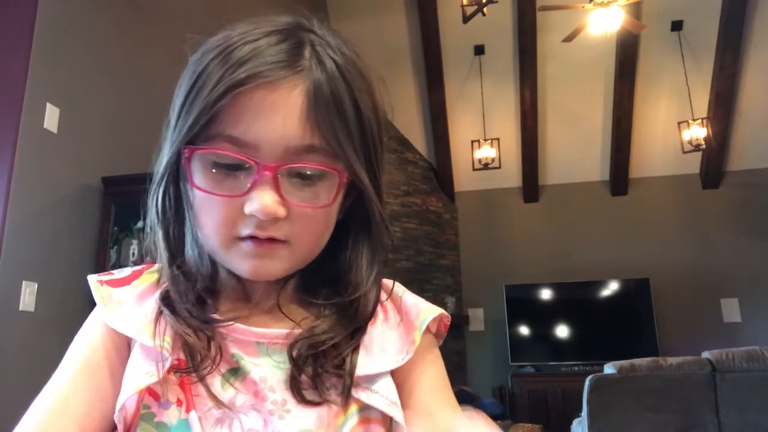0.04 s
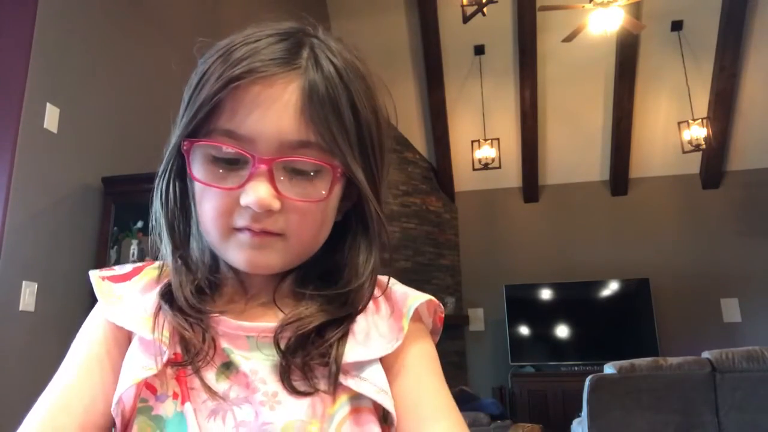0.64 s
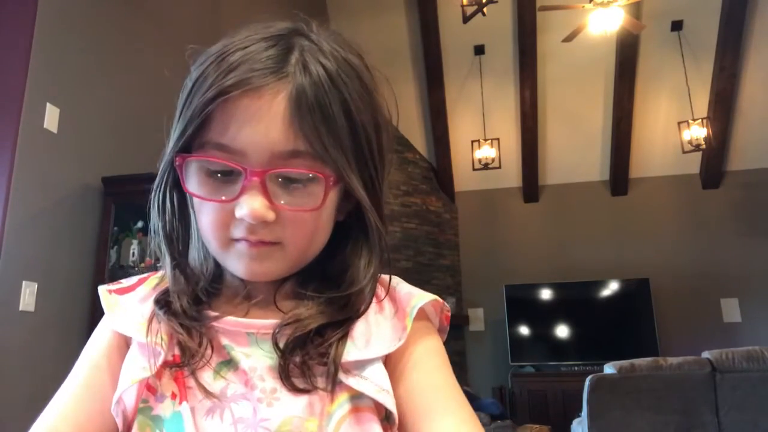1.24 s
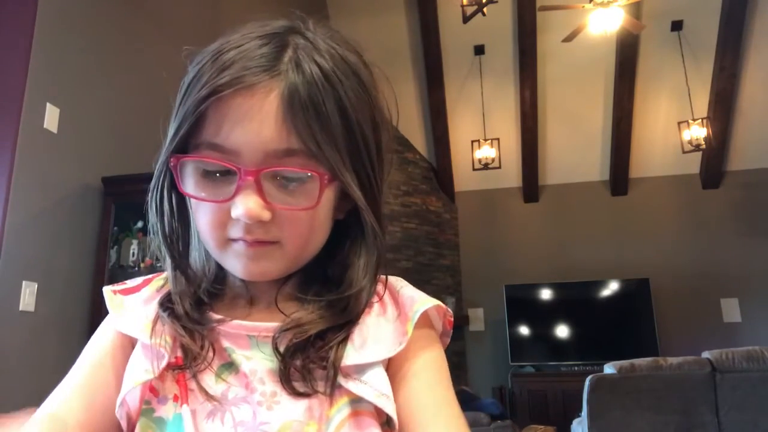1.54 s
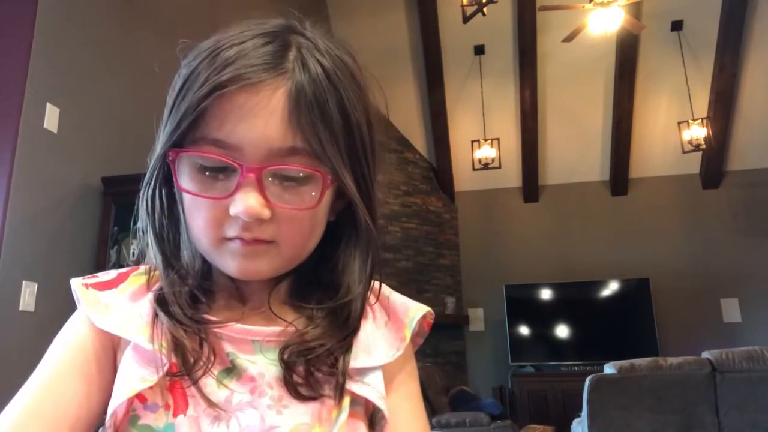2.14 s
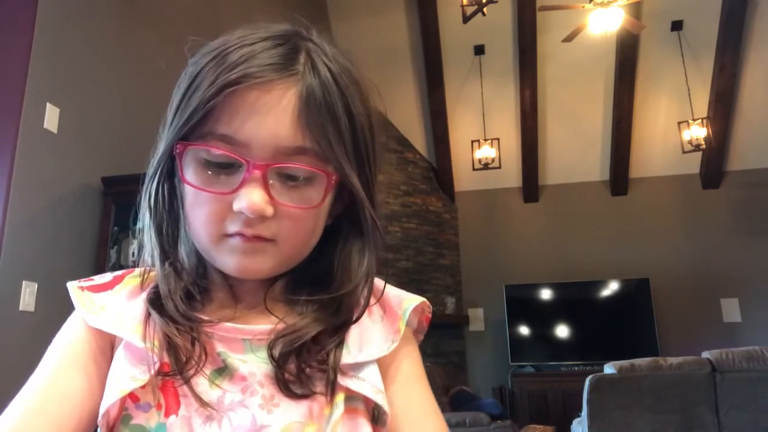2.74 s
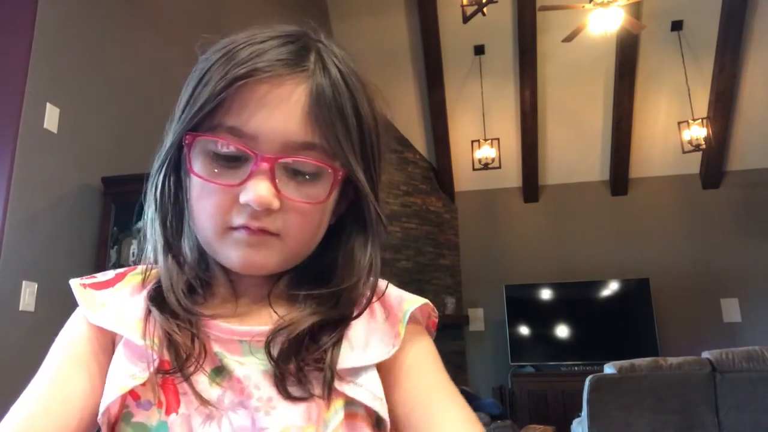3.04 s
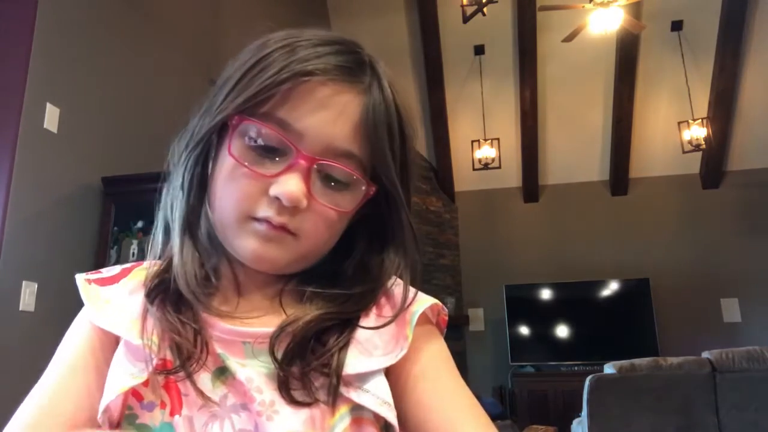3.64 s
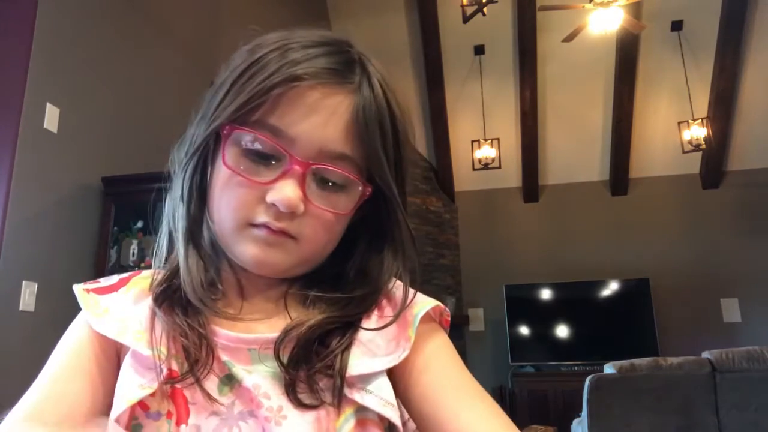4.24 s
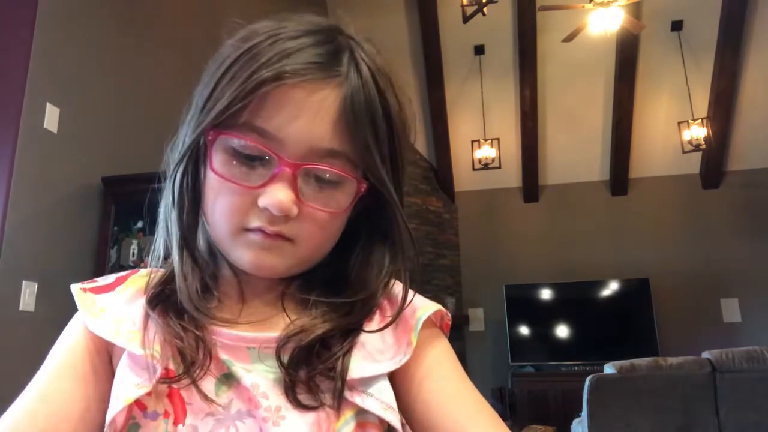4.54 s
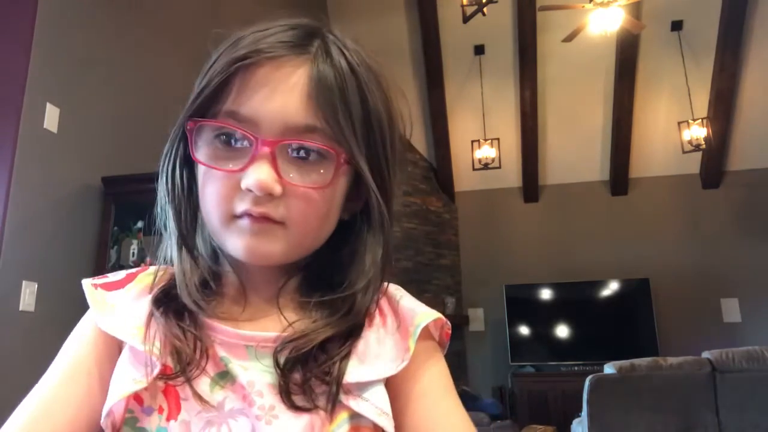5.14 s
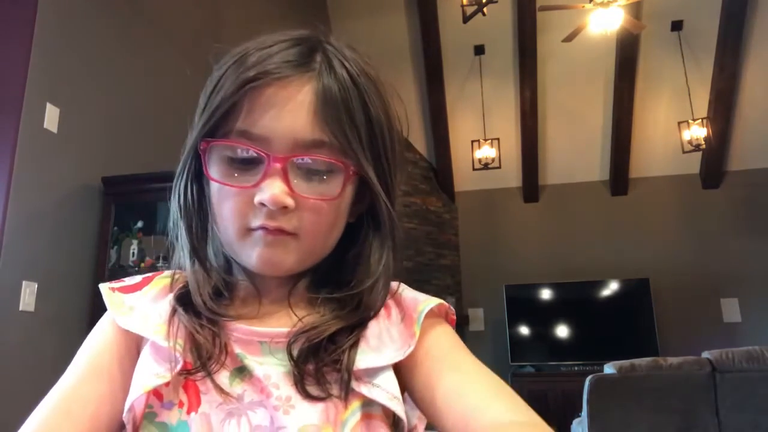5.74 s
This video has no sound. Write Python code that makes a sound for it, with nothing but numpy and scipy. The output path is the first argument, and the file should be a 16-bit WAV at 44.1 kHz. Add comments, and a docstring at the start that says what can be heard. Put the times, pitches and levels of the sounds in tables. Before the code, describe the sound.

A small plastic cup is picked open with dry clicks and crinkles of its film lid, then a spoon scrapes faintly.

```python
"""Picking open a dessert cup

A small plastic cup is handled just below the microphone in a large living room, over a low air rumble.
The cup snaps in dry clicks as it buckles, and its seal ticks as it peels. The film lid crinkles in short
strokes and twice crackles loudly. Fingertips rub the plastic and the table takes a few soft bumps.
Near the end a spoon scrapes and rings."""
import sys
import numpy as np
from scipy import signal
from scipy.fft import rfft, irfft
from scipy.io import wavfile

SR = 44100
rng = np.random.default_rng(int(sys.argv[2]) if len(sys.argv) > 2 else 0)


def output_pcm(signal):
    """Save a mono or channel-first signal as 16-bit PCM at the path in sys.argv[1].

    Samples are clipped to [-1, 1] before scaling.
    """
    pcm = np.clip(np.atleast_2d(signal).T, -1, 1) * 32767
    wavfile.write(sys.argv[1], SR, np.round(pcm).astype(np.int16))


N = 259308

# A mode is a pitch at which something likes to ring; the wider it is, the sooner it dies away.
# Modes of the cup's hollow, its wall and the lid's finest creases: (pitch [Hz], width [Hz], level [dB])
HOLLOW_MODES = [(580, 280, 3.5), (856, 470, -2.5)]
WALL_MODES = [(1264, 370, -0.22), (1900, 670, -1.6)]
SIZZLE_MODES = [(7300, 3100, 1.5), (11500, 1800, -3.5), (14100, 1900, -6)]


def undb(db):
    """Turn decibels into a factor to multiply by."""
    return 10 ** (np.asarray(db) / 20)


def unit(x):
    """Scale a signal to an average power of 1."""
    return x / np.sqrt(np.mean(x ** 2))


def on_log(hz, rows, column=1):
    """Read between the rows of a table by pitch, with all octaves equally wide."""
    rows = np.array(rows)
    return np.interp(np.log(np.maximum(hz, 1)), np.log(rows[:, 0]), rows[:, column])


def add(out, start, sound):
    """Mix a sound in at a start time in seconds."""
    i = int(np.clip(start * SR, 0, N - 1))
    out[i:i + len(sound)] += sound[:N - i]


def ring(modes, size=512):
    """The fading tones that one sharp tap draws from a set of modes, with a total energy of 1."""
    t = np.arange(size) / SR
    out = sum((-1) ** k * width * undb(db) * np.exp(-np.pi * width * t) * np.sin(2 * np.pi * hz * t)
              for k, (hz, width, db) in enumerate(modes))
    edges_hz = [modes[0][0] * .7, min(modes[-1][0] * 1.25, SR * .48)]  # little sound beyond the modes
    out = signal.lfilter(*signal.butter(3, edges_hz, "band", fs=SR), out)
    return out / np.sqrt(np.sum(out ** 2))


def film_modes(shape, pitch_hz):
    """Tune the modes of a patch of film: a smaller, tighter patch rings higher."""
    return [(ratio * pitch_hz, width * pitch_hz, db) for ratio, width, db in shape]


def shower(size, per_second, spread_db, grain_s):
    """Energy over time of many tiny creases or slips, mostly weak, a few strong; it averages 1."""
    chance = rng.random(size) * SR / per_second
    hit = chance < 1
    grains = np.zeros(size)
    grains[hit] = undb(spread_db * np.minimum(-np.log(chance[hit]), 4.5)) ** 2  # the rarer, the stronger
    energy = signal.lfilter([1], [1, -np.exp(-1 / (grain_s * SR))], grains) + 1e-9
    return energy / energy.mean()


def air(hiss_db=-57, drift_db=0.2, hum_hz=104, hum_width_hz=25, hum_db=-61):
    """Ventilation rumbles and hisses steadily, and a low mode of the room hums along."""
    # Tone colour of the moving air: (pitch [Hz], relative level [dB])
    colour = [(15, -39), (25, -2.5), (84, -5), (223, -4), (503, -19.5), (575, -18), (734, -22), (1130, -25),
              (1740, -25), (1940, -30.5), (2350, -24), (3620, -27), (6380, -26.5), (14800, -46.5),
              (16000, -35)]
    hz = np.fft.rfftfreq(N, 1 / SR)
    hiss = unit(irfft(rfft(rng.standard_normal(N)) * undb(on_log(hz, colour)), N))
    hum_peak = 1 / (1 + (2 * (hz - hum_hz) / hum_width_hz) ** 2)
    hum = unit(irfft(rfft(rng.standard_normal(N)) * hum_peak, N))
    drift = np.interp(np.arange(N) / SR, np.linspace(0, N / SR, 24), rng.standard_normal(24))
    return undb(hiss_db + drift_db * drift) * hiss + undb(hum_db) * hum


def room_echo(sound, build_s=0.0023):
    """Reflections blur into a tail that builds up after the sound and dies sooner in the treble."""
    # The room's echo: (pitch [Hz], level [dB], time to fade by 60 dB [s])
    echo_bands = [(99, -8, 1), (507, -12, 0.4), (1440, -14, 1), (3420, -6.5, 0.77), (6900, -1, 0.65),
                  (9000, -0.5, 0.46), (15300, -5, 0.46)]
    t, hz = np.arange(SR) / SR, np.fft.rfftfreq(SR, 1 / SR)
    noise, tail = rfft(rng.standard_normal(SR)), 0
    for low in 31.25 * 2 ** (np.arange(19) / 2):  # bands half an octave wide
        centre = low * 2 ** (1 / 4)
        fade_s = on_log(centre, echo_bands, column=2)
        shape = np.exp(-np.log(1000) * t / fade_s) * (1 - np.exp(-t / build_s))
        band = irfft(noise * ((hz >= low) & (hz < low * 2 ** .5)), SR)
        tail = tail + undb(on_log(centre, echo_bands)) * band * shape / np.sqrt(np.sum(shape ** 2))
    return signal.fftconvolve(sound, tail)[:N]


def table_bumps(sag=0.033, rattle=0.24):
    """Soft blows set the table top swinging; its pitch sags as the push lets go."""
    # Blows on the table: (time [s], strength [dB], length of contact [s])
    blows = [(0.812, -43.5, 0.0018), (0.833, -43, 0.0012), (0.849, -16.5, 0.022), (2.741, -34.5, 0.0081),
             (4.161, -42, 0.0029), (4.184, -51, 0.0025), (4.193, -22.5, 0.018), (4.331, -57.5, .002),
             (5.492, -32.5, 0.0084)]
    # Modes of the table top: (pitch [Hz], level [dB], time to fade by 60 dB [s])
    table_modes = [(68.2, -10.5, .26), (103.8, -2.5, 0.32), (150, -5.5, .23), (249, 0, 0.046),
                   (328, 16.5, 0.023), (405, 6, 0.015)]
    out = np.zeros(N)
    for start, db, contact_s in blows:
        for hz, mode_db, fade_s in table_modes:
            t = np.arange(int(fade_s * SR)) / SR
            swing = np.exp(-np.log(1000) * t / fade_s) * (1 - np.exp(-2 * hz * t))
            swing /= 1 + (hz * contact_s) ** 4  # a long contact moves only the low modes
            phase = 2 * np.pi * np.cumsum(hz * (1 + sag * np.exp(-hz * t / 2))) / SR
            near_mode = signal.butter(2, [hz / 2, hz * 2], "band", fs=SR, output="sos")
            noise = unit(signal.sosfilt(near_mode, rng.standard_normal(len(t))))
            add(out, start, undb(db + mode_db) * swing * (np.sqrt(2) * np.sin(phase) + rattle * noise))
    return out


def finger_rubs(grip=0.39):
    """Skin slips over the plastic in quick little jerks that ring one mode; the pressure comes and goes."""
    # Touches of a fingertip: (start [s], length [s], level [dB], pitch [Hz])
    touches = [(0.086, 0.031, -53.5, 454), (0.237, .035, -54, 505), (.358, 0.0056, -37, 2230),
               (0.563, 0.031, -53, 490), (.736, 0.024, -41.5, 600), (1.1, 0.22, -63.5, 482),
               (2.038, .03, -54.5, 3000), (3.189, 0.047, -55, 2610), (3.295, 0.016, -55.5, 2700),
               (3.311, 0.039, -58, 581), (3.48, .016, -37.5, 4270), (4.115, 0.023, -27.5, 6060),
               (5.057, 0.0076, -47.5, 940), (5.762, 0.05, -54, 1405)]
    out = np.zeros(N)
    for start, length, db, hz in touches:
        size = int(length * SR)
        jerks = shower(size, per_second=2200, spread_db=1.5, grain_s=0.00035)
        slips = np.sqrt(grip + jerks) * rng.standard_normal(size)
        pressure = np.sin(np.pi * np.arange(size) / size)
        width_hz = 110 + .11 * hz
        sound = signal.fftconvolve(slips * pressure, ring([(hz, width_hz, 0)], size=1024))
        add(out, start, undb(db) * sound * np.sqrt(size / 2 / np.sum(sound ** 2)))
    return out


def spoon_scrape(spread_db=3, slips_per_second=2500):
    """Many little slips keep the spoon ringing while it is dragged."""
    # Modes of the spoon: (pitch [Hz], width [Hz], level [dB])
    spoon_modes = [(1840, 44, -5.5), (2090, 160, -10), (2746, 43, 6.5), (3240, 60, -3.5), (4224, 36, 2),
                   (4630, 48, -3.5), (5550, 120, -6), (6380, 67, -9), (7070, 81, -9.5), (8050, 60, -25),
                   (8170, 60, -34), (9300, 84, -31), (11400, 270, -44)]
    # How hard the spoon scrapes: (time [s], strength [dB])
    drag = [(5.205, -64), (5.265, -51), (5.31, -54), (5.345, -46), (5.4, -50.5), (5.43, -58), (5.47, -50.5),
            (5.5, -75), (5.6, -110)]
    slipping = rng.random(N) < slips_per_second / SR
    slips = slipping * rng.standard_normal(N) * undb(spread_db * rng.exponential(size=N))
    force = undb(np.interp(np.arange(N) / SR, *np.transpose(drag), left=-200, right=-200))
    return signal.fftconvolve(unit(slips) * force, ring(spoon_modes, size=16384))[:N]


def lid_crinkle(rub=0.24):
    """Each stroke lets go a shower of creases over a smooth rub of skin; some creases ring only one mode."""
    # Finger strokes on the lid:
    # (start [s], swell [s], fade [s], film level [dB], wall compared with film [dB], film pitch [Hz])
    strokes = [(0, 0.0051, 0.08, -62, -5, 5000), (.173, 0.0017, 0.19, -49.5, -11.5, 5130),
               (.29, 0.066, 0.26, -51, -8, 5330), (.56, .07, .02, -46, -17, 5400),
               (0.635, 0.0085, 0.14, -39, -12, 5600), (.66, 0.045, 0.19, -36.5, -14, 5440),
               (.716, 0.019, 0.085, -28.5, -10.5, 5260), (.802, 0.012, 0.0048, -27.5, -4.5, 5250),
               (1.201, .1, 0.083, -54.5, -13, 4800), (1.621, 0.029, 0.023, -53, -0.5, 4300),
               (1.72, 0.0027, 0.11, -55.5, -4, 4940), (1.95, 0.02, 0.44, -57, -5, 5000),
               (2.39, 0.056, 0.49, -47.5, -9, 5150), (2.456, 0.0082, 0.0096, -35.5, -13, 4630),
               (2.518, 0.0026, 0.008, -38.5, -2, 4600), (2.66, 0.092, 0.13, -42.5, -8.5, 5070),
               (2.774, 0.0026, 0.01, -34, -13, 4800), (2.82, 0.038, 0.26, -51.5, -11, 5500),
               (3.02, 0.0054, 0.26, -48, -9, 5850), (3.084, 0.0087, .024, -36, -11, 4900),
               (3.18, 0.027, 0.1, -52, -18, 3640), (3.291, 0.012, 0.42, -52.5, -7, 4320),
               (3.477, .009, 0.018, -35.5, -14.5, 4660), (3.505, .006, 0.012, -42, -14, 4950),
               (3.75, .05, .064, -56.5, -25, 5000), (3.934, 0.019, 0.17, -52, -6, 5070),
               (4.034, 0.068, .012, -39, -9, 5000), (4.074, 0.04, 0.038, -30.5, -8, 5300),
               (4.114, 0.0068, 0.025, -29.5, -20, 7050), (4.145, 0.012, .012, -38, -6, 4960),
               (4.685, 0.018, .048, -50.5, -11, 4800), (5.051, 0.025, .14, -51, -10, 5100),
               (5.217, 0.015, 0.15, -52.5, -7, 5070), (5.322, 0.011, 0.16, -54.5, -4.5, 6130),
               (5.66, 0.062, 0.15, -55, -5.5, 6050)]
    # Modes of the film lid: (pitch [times film pitch], width [times film pitch], level [dB])
    lid_shape = [(.47, 0.058, 1), (.76, 0.25, 0), (1, 0.046, 0), (1.27, 0.33, 0.5)]
    out, t = np.zeros(N), np.arange(SR // 3) / SR
    for start, swell, fade, film_db, wall_db, pitch_hz in strokes:
        sizzle_db = -11 + 14.5 * np.log2(pitch_hz / 5000)
        parts = ((HOLLOW_MODES, wall_db - 8), (WALL_MODES, wall_db),
                 (film_modes(lid_shape, pitch_hz), 0), (SIZZLE_MODES, sizzle_db))
        force = np.minimum(t / swell, 1) * np.exp(-2 * np.maximum(t - swell, 0) / fade)
        shared = shower(len(t), per_second=1500, spread_db=2.0, grain_s=0.00027) + rub
        for modes, part_db in parts:
            power = np.array([width * undb(db) ** 2 for _, width, db in modes])
            for mode, share in zip(modes, power / power.sum()):
                own = 0.59 * shower(len(t), per_second=270, spread_db=4.5, grain_s=0.0018)
                push = force * unit(np.sqrt(shared + own) * rng.standard_normal(len(t)))
                sound = signal.fftconvolve(push, ring([mode]))
                add(out, start, undb(film_db + part_db) * np.sqrt(share) * sound)
    return out


def seal_ticks(pitch_hz=4080, least_gap_s=0.012):
    """The seal lets go bit by bit: a list of small, duller snaps for plastic_snaps to play."""
    # Runs of ticks: (start [s], end [s], first gap [s], next gap [times the last], film level [dB])
    peels = [(2.219, 2.31, .0228, 1.12, -49), (2.3412, 2.446, .031, .72, -46.5)]
    ticks = []
    for time, end, gap, ratio, film_db in peels:
        wall_db, hollow_db = film_db - 8.5, film_db - 12.5
        while time < end:
            ticks.append((time, film_db, wall_db, hollow_db, pitch_hz))
            time += max(gap, least_gap_s)
            gap *= ratio
    return ticks


def cup_buckles(base_hz=4536, base_wall_db=-57.5, db_per_octave=88):
    """List the cup's snaps with a pitch: the more wall gives way, the larger and lower the patch."""
    # Snaps of the cup: (time [s], film level [dB], wall level [dB], hollow level [dB])
    buckles = [(.319, -46, -65, -62), (.3603, -40, -39.5, -46.5), (.396, -48, -74, -68),
               (.5407, -43.5, -87, -76), (0.6453, -41, -66, -71), (0.6495, -46, -54, -67),
               (0.7596, -22.5, -31.5, -41), (0.799, -30, -51, -47), (.815, -36, -38.5, -55),
               (.8319, -37, -43.5, -46), (2.0969, -36, -27, -43), (2.1695, -42, -60, -75),
               (2.4651, -44.5, -40, -49.5), (2.519, -43.5, -48, -56), (2.861, -49.5, -54, -55),
               (2.9054, -46.5, -49, -63), (3.0207, -45, -61, -72), (4.032, -37.5, -50.5, -56),
               (4.083, -51, -36, -42), (4.105, -29, -33.5, -28), (4.1131, -33, -37, -49),
               (4.1597, -37.5, -61, -37.5), (4.3294, -53, -55, -59), (4.6896, -46.5, -54.5, -64),
               (4.9116, -50.5, -54, -49), (4.944, -52.5, -53.5, -56.5), (5.0621, -47, -54, -52),
               (5.1161, -48, -51, -75)]
    return [(time, film_db, wall_db, hollow_db, base_hz * 2 ** ((base_wall_db - wall_db) / db_per_octave))
            for time, film_db, wall_db, hollow_db in buckles]


def plastic_snaps(events, chatter_s=.002, level_span_s=.004):
    """The plastic gives way at a blow; the crease chatters for a moment and every part of the cup rings."""
    # Modes of the tight patch that snaps: (pitch [times snap pitch], width [times snap pitch], level [dB])
    patch_shape = [(.5, 0.072, 0), (.83, 0.33, 2.5), (1.08, 0.097, 8), (1.42, 0.43, 2.5)]
    out, t = np.zeros(N), np.arange(256) / SR
    for start, film_db, wall_db, hollow_db, pitch_hz in events:
        push = .12 * rng.standard_normal(len(t)) * np.exp(-t / chatter_s)
        push[0] = 1  # the blow itself
        sizzle_db = film_db - 16 + 20 * np.log2(pitch_hz / 5000)  # small creases sizzle more
        parts = ((HOLLOW_MODES, hollow_db), (WALL_MODES, wall_db),
                 (film_modes(patch_shape, pitch_hz), film_db), (SIZZLE_MODES, sizzle_db))
        for modes, db in parts:
            sound = signal.fftconvolve(push, ring(modes))
            add(out, start, sound * undb(db) * np.sqrt(level_span_s * SR / np.sum(sound ** 2)))
    return out


def scene():
    """The sounds reach the microphone directly and as an echo; the spoon has the largest share of echo."""
    snaps = plastic_snaps(cup_buckles() + seal_ticks())
    film, skin, thuds, scrape = lid_crinkle(), finger_rubs(), table_bumps(), spoon_scrape()
    direct = snaps + undb(-2.5) * film + skin + thuds + undb(1) * scrape
    into_room = undb(-1.5) * snaps + undb(-8.5) * (film + skin) + undb(-0.5) * thuds + undb(3) * scrape
    return (direct + room_echo(into_room) + air())[None]


def record(dry):
    """The microphone loses the deepest bass, and the highest treble is cut off."""
    bass_cut = signal.butter(7, 47, "high", fs=SR, output="sos")
    treble_cut = signal.ellip(10, .2, 70, 15850, fs=SR, output="sos")
    return signal.sosfilt(treble_cut, signal.sosfilt(bass_cut, dry))


dry = scene()
out = record(dry)
output_pcm(out)
```